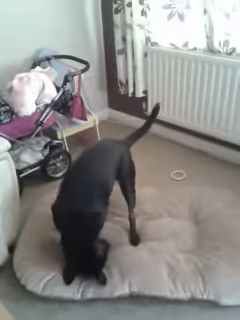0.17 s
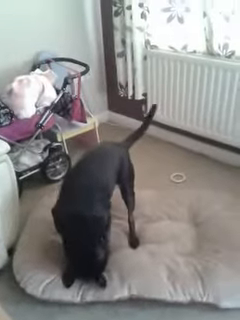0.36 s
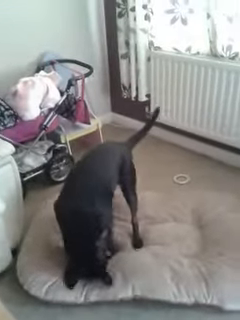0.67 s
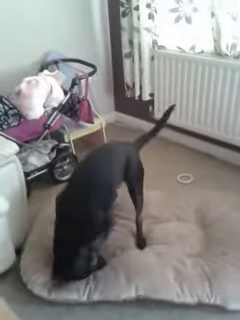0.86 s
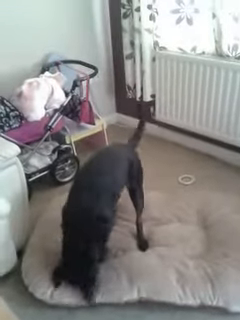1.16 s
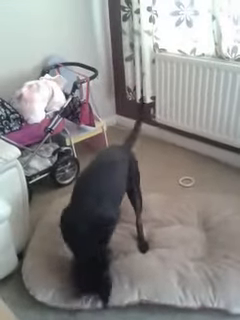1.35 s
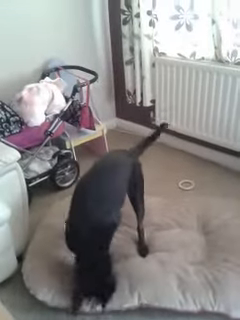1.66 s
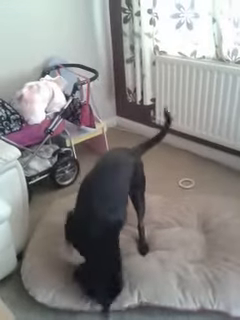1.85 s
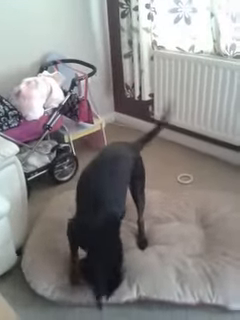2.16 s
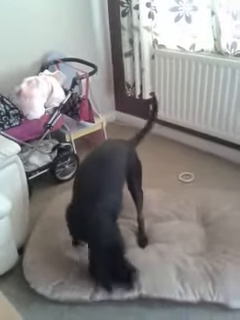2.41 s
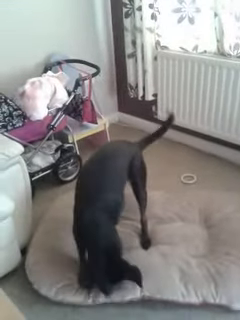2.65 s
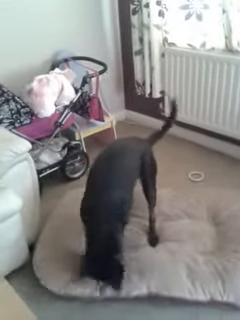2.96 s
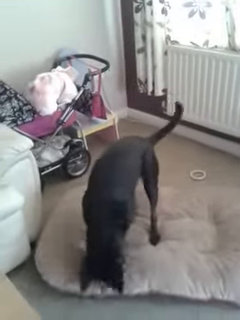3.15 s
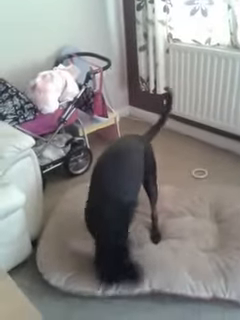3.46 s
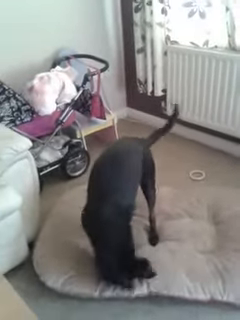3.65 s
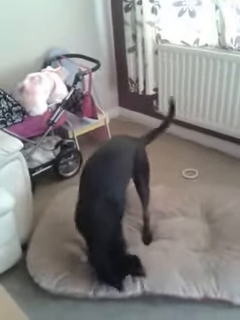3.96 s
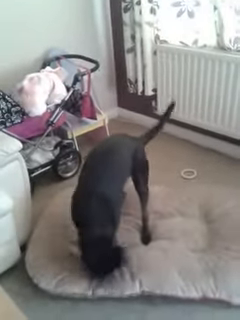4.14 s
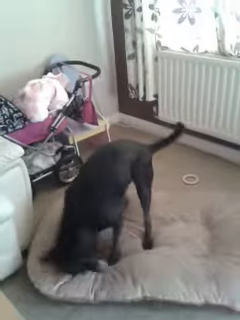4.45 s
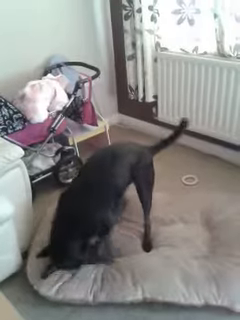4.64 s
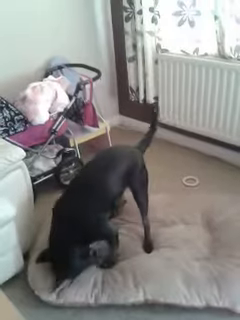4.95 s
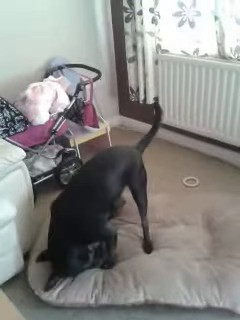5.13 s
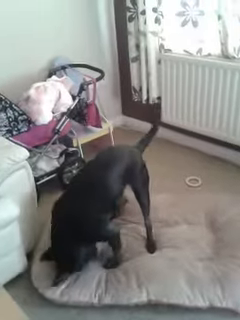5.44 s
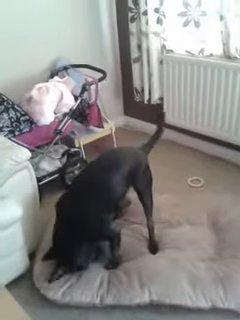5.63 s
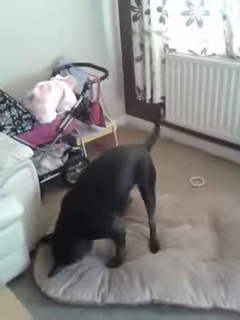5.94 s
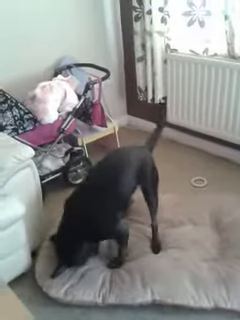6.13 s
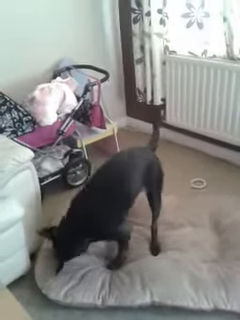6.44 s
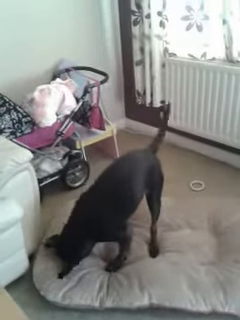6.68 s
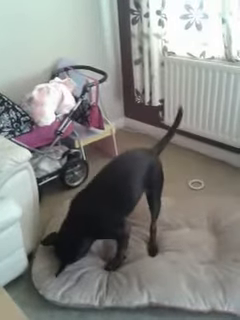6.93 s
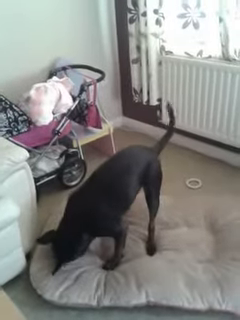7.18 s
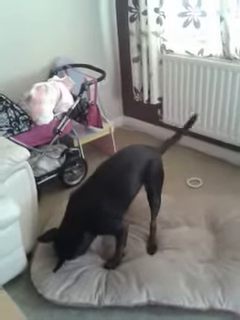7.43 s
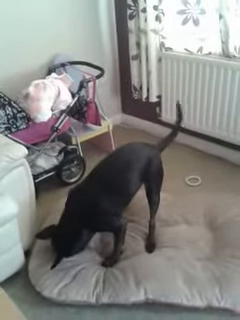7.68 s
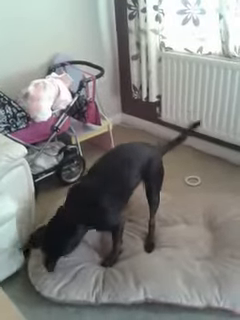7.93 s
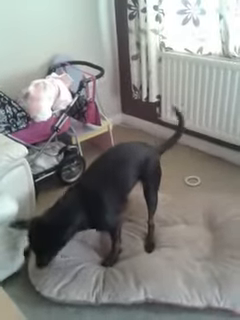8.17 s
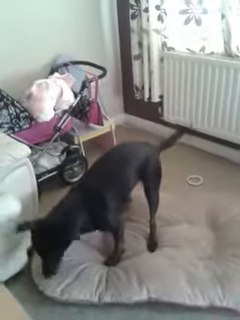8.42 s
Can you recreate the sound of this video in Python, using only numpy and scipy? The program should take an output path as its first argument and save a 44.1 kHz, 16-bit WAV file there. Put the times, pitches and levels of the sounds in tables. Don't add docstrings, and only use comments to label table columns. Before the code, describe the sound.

A dog roots and paws at a stuffed bed with uneven rustles, dull thumps and scratches, then knocks something hollow with a sharp metallic clink.

```python
import sys
import numpy as np
from scipy import signal
from scipy.fft import rfft, irfft
from scipy.io import wavfile
from scipy.ndimage import uniform_filter1d

SR = 44100
rng = np.random.default_rng(int(sys.argv[2]) if len(sys.argv) > 2 else 0)


def gain_from_db(level_db):
    decades = np.asarray(level_db, float) / 20
    return 10 ** decades


def log_audio(samples):
    frames = np.atleast_2d(samples).T
    limited = np.clip(frames, -1, 1)
    pcm = np.round(limited * 32767).astype(np.int16)
    wavfile.write(sys.argv[1], SR, pcm)


N = 377055


def unit(x):
    return x / np.sqrt(np.mean(x ** 2))


def band(x, hz, width_hz):
    return signal.lfilter(*signal.iirpeak(min(hz, 9000), hz / width_hz, fs=SR), x)


def steep(x, low_hz, high_hz):
    return unit(signal.sosfilt(signal.butter(3, [low_hz, high_hz], "band", fs=SR, output="sos"), x))


def grains(count, rate, scatter_db):
    draw = rng.random((count, 2))
    happens = draw[:, 0] < rate / SR
    strength = gain_from_db(-scatter_db * np.log(draw[:, 1] + 1e-9))
    return happens * strength * rng.standard_normal(count)


def walk(rate):
    hold = int(SR / rate)
    levels = np.repeat(rng.standard_normal(N // hold + 1), hold)
    return unit(uniform_filter1d(levels, hold)[:N])


def add(out, s, x):
    i = int(s * SR)
    out[i:i + len(x)] += x[:N - i]


def fade(t, t60, rise):
    swell = np.sin(np.pi / 2 * np.clip(t / max(rise, 1e-4), 0, 1)) ** 2
    return swell * gain_from_db(-60 * t / max(t60, .01))


# frequency in Hz, density in dB per Hz.
AIR = [(15, -10.5), (35, -18.5), (65, -28.5), (100, -40.5), (200, -32), (330, -19), (740, -20.5),
       (2300, -26), (6700, -33), (7400, -57)]
AIR_DB = -61.5


def air():
    hz, db = np.transpose(AIR)
    shape = np.interp(np.log(np.fft.rfftfreq(N, 1 / SR) + 1), np.log(hz), db)
    return gain_from_db(AIR_DB) * unit(irfft(rfft(rng.standard_normal(N)) * gain_from_db(shape), N))


# start in seconds, level in dB, pitch in Hz, t60 in seconds.
BUMPS = [(2.91, -54, 70, .2), (3.08, -46, 24, .2), (3.16, -58, 45, .15), (3.39, -60, 60, .15),
         (4.69, -60, 65, .1), (5.409, -62, 60, .12), (5.822, -43, 62, .16), (7.509, -60, 55, .15),
         (8.149, -62, 35, 0.31)]


def hand():
    out, t = np.zeros(N), np.arange(SR // 2) / SR
    for s, db, hz, t60 in BUMPS:
        add(out, s, gain_from_db(db) * np.sin(2 * np.pi * hz * t) * fade(t, t60, 0.006))
    return out


ROOM_T60_S, ROOM_DB = 0.23, -11


def room(x):
    t = np.arange(int(.6 * SR)) / SR
    echoes = rng.standard_normal(len(t)) * (rng.random(len(t)) < .01 + 6 * t) * (t > .003)
    dull = band(echoes, 810, 2700)
    bright = echoes - dull
    tail = dull * fade(t, ROOM_T60_S, .002) + gain_from_db(-8.5) * bright * fade(t, 0.48 * ROOM_T60_S, .002)
    return signal.fftconvolve(x, tail / np.sqrt(np.sum(tail ** 2)))[:N]


KNOCKS_S = [
    5.359,
    5.443,
    5.821,
]
# frequency in Hz, t60 in seconds, level in dB at the
# first knock, at the rebound and at the hard knock, split of the pair in Hz, partner's share.
TUBE = [(2409, 0.33, -53, -50.5, -5, 8.5, -0.92), (2440, 0.3, -57, -59, -25.5, 9, 0.5),
        (3720, 0.3, -49, -54, -26.5, -20.5, 0.77), (4586, 0.34, -55, -55, -22.5, -10, -0.23),
        (4620, 0.8, -52, -56, -45, 10.5, 0.45), (5140, .34, -61, -61, -39.5, 16, .45),
        (6500, 0.4, -48, -57, -40, 21, -.45), (7050, 0.22, -42, -59, -31, 19, 0.25)]
# frequency in Hz, level in dB, t60 in seconds.
FRAME = [(472, -10.5, 0.33), (635, -16, 0.18), (704, -12.5, 0.2), (733, -6.5, 0.099), (873, -4.5, 0.25),
         (915, -8, 0.18), (1024, -6.5, 0.31), (1060, -7.5, 0.43), (1181, -10, 0.55), (1270, -13.5, 0.098),
         (1505, -19.5, .3), (1578, -13.5, 0.28), (1779, -10.5, .3), (1968, -8.5, 0.3), (2190, -12, 0.24),
         (2330, -13, 0.17)]
FRAME_DB = [-20, -26, -9.5]
BEAT_LAG_S = .011
RATTLE_DB = 2.5


def knocks():
    out, t = np.zeros(N), np.arange(SR // 2) / SR
    for k, s in enumerate(KNOCKS_S):
        rattle = gain_from_db(RATTLE_DB * walk(70)[:len(t)])
        for hz, t60, *db, split, share in TUBE:
            partner = np.sin(2 * np.pi * (hz * t + split * (t - BEAT_LAG_S)))
            pair = np.sin(2 * np.pi * hz * t) + share * partner
            add(out, s, gain_from_db(db[k]) * rattle * pair * fade(t, t60, 0.0018))
        for hz, db, t60 in FRAME:
            ring = np.sin(2 * np.pi * (hz * t + rng.random()))
            add(out, s, gain_from_db(db + FRAME_DB[k]) * ring * fade(t, t60, 0.0061))
    return out


# peak in seconds, rise in seconds, fall in seconds, # fibre
# hiss in dB, weight pressed into the stuffing in dB.
SWIPES = [(.04, 0.062, 0.18, -58, -5), (.2, 0.026, 0.094, -51, 2.5), (.712, .006, .06, -55, -12),
          (.75, 0.04, 0.18, -57, -1), (.86, 0.16, 0.087, -49, -2.5), (.938, 0.016, 0.093, -51, -7),
          (1.26, 0.067, 0.23, -50.5, 1), (2.32, 0.11, 0.24, -53.5, 5.5), (2.41, 0.16, 0.23, -51, -12),
          (2.959, 0.11, 0.079, -41.5, 5.5), (3.405, 0.067, 0.12, -43.5, 4.5), (3.49, .06, 0.06, -49, -11),
          (4.71, 0.044, .12, -50, 5.5), (4.82, .12, 0.12, -50, 3), (5.07, 0.11, 0.093, -57, -3),
          (5.27, 0.1, .12, -56.5, 0), (5.38, 0.063, 0.052, -42, -4), (5.455, 0.036, 0.06, -48, 2),
          (5.835, .02, 0.17, -30, 2), (6.08, 0.54, 0.089, -43, -7), (6.885, 0.037, .2, -52, -4),
          (7.578, .006, .03, -48, -10), (7.62, 0.17, 0.18, -53, 2), (7.865, 0.073, 0.11, -34.5, -2)]
# peak in seconds, rise in seconds, fall in seconds, #
# fibre hiss in dB, weight pressed into the stuffing in dB.
MORE_STROKES = [(.58, 0.46, .4, -70, -8), (1.15, .3, 0.27, -59.5, -4), (1.38, 0.16, 0.23, -55.5, -10),
                (1.84, .17, 0.31, -55.5, 0), (2.06, .4, 0.12, -53.5, -1), (2.72, .35, .3, -53, -9),
                (2.82, .4, 0.085, -51, -1), (3.1, .2, 0.21, -61, 6), (3.33, .2, .1, -59, -1),
                (3.71, .3, .6, -59, 0), (4.1, 0.38, 0.67, -53.5, -9.5), (4.26, .4, 0.28, -47, 1),
                (4.56, .5, 0.14, -57, -8), (5.56, .1, .12, -59, 3), (5.78, .16, .2, -49, -0.5),
                (6.32, 0.15, .5, -45.5, -2), (6.58, .4, 0.34, -54, 5.5), (6.73, .3, .3, -53.5, 5),
                (7.03, 0.16, 0.34, -50, -5.5), (7.4, 0.32, 0.59, -55.5, 1.5), (7.75, .25, .2, -54.5, 8),
                (8.04, .2, .2, -55, 2), (8.16, .2, .2, -55.5, 5), (8.27, 0.74, .25, -55, 1),
                (8.55, 0.23, .2, -54.5, -1)]
STROKE_DROP_DB = 15


def strokes(share, offset_db, lag, rest_db):
    t = np.arange(0, N / SR + .01, .002)
    every = np.concatenate([SWIPES, MORE_STROKES])
    peak, rise, fall, db, weight_db = np.transpose(every)[:, :, None]
    late = t - peak - lag
    slope = np.maximum(-late / rise, late / fall)
    db = db + offset_db + share * weight_db - STROKE_DROP_DB * slope
    power = np.sum(gain_from_db(db) ** 2, axis=0) + gain_from_db(rest_db) ** 2
    return np.interp(np.arange(N) / SR, t, np.sqrt(power))


# frequency in Hz, width in Hz, level in dB.
CRUNCH = [(360, 29, -1), (800, 1030, 17), (1300, 1400, -22.5)]
# frequency in Hz, width in Hz, level in dB.
SCRAPE = [(2094, 860, 0.69), (2620, 1170, -1.6)]
# frequency in Hz, width in Hz, level in dB.
HISS = [(4600, 2400, 6), (5650, 1800, 10.5), (6600, 1300, -30.5)]
# level in dB of crunch, scrape and hiss.
REST_DB = [-75.5, -71.5, -72.5]
SCRAPE_DB, SCRAPE_PER_WEIGHT, SCRAPE_LAG_S = -4, -0.39, .012


def cloth():
    crunch_gain = strokes(0.85, 0, 0, REST_DB[0])
    scrape_gain = strokes(SCRAPE_PER_WEIGHT, SCRAPE_DB, SCRAPE_LAG_S, REST_DB[1])
    hiss_gain = strokes(0, 0, 0, REST_DB[2])
    layers = [  # gain, resonances, cracks per second, flicker in dB
        (crunch_gain, CRUNCH, 2500, 1.6),
        (scrape_gain, SCRAPE, 6000, 1.3),
        (hiss_gain, HISS, 12000, 1.1)]
    out = np.zeros(N)
    for gain, modes, rate, flicker_db in layers:
        crack = grains(N, rate, 0.42)
        layer = np.zeros(N)
        for hz, width_hz, db in modes:
            flicker = gain_from_db(db + flicker_db * np.tanh(walk(24)))
            layer += flicker * band(band(crack, hz, 1.7 * width_hz), hz, 1.7 * width_hz)
        out += unit(layer) * gain
    return out


# start in seconds, length in seconds, start pitch in Hz,
# end pitch in Hz, level in dB.
SKIDS = [(1.24, 0.12, 1400, 950, -47), (1.6, 0.09, 1400, 400, -56), (1.91, .22, 1250, 820, -48),
         (5.25, .07, 450, 800, -45), (5.29, 0.065, 950, 1050, -39)]
SKID_WIDTH_HZ = 330


def skids():
    out = np.zeros(N)
    for s, length, start_hz, end_hz, db in SKIDS:
        share = np.arange(int(length * SR)) / (length * SR)
        hz = end_hz + (start_hz - end_hz) * (1 - share) ** 3.1
        phase = 2 * np.pi * np.cumsum(hz) / SR
        rough = uniform_filter1d(rng.standard_normal(SR // 2), int(SR / SKID_WIDTH_HZ))
        rough = unit(rough)[:len(share)]
        add(out, s, gain_from_db(db) * rough * np.sin(phase) * np.sin(np.pi * share ** 0.68))
    return out


THUD_KNEE_DB, THUD_SQUEEZE = -17.5, 0.94


def contacts(table, rise, tick_db, thud_db):
    out, t = np.zeros(N), np.arange(SR // 2) / SR
    for s, db, hz, length, bright_db in table:
        crack = grains(len(t), 4000, 1.1)
        body = steep(crack, 0.54 * hz, 1.483 * hz) + gain_from_db(bright_db) * steep(crack, 1.86 * hz, 2976)
        thud = steep(crack, 160.6, 323) + gain_from_db(7.5) * steep(crack, 309.4, 427)
        body += gain_from_db(thud_db - THUD_SQUEEZE * max(db - THUD_KNEE_DB, 0)) * thud
        hold = fade(t, 1.11, rise) * gain_from_db(-40 * (t / max(length, .02)) ** 1.636)
        tick = np.sin(2 * np.pi * hz * t) * fade(t, .007, 0.00052)
        snap = steep(crack, 1500, 7000) * fade(t, 0.022, .0005)
        tick += gain_from_db(-20.5 + bright_db / 2) * snap
        add(out, s, gain_from_db(db) * (gain_from_db(-11.5) * body * hold + gain_from_db(tick_db) * tick))
    return out


# start in seconds, peak level in dB, body pitch in Hz,
# length in seconds, bright share in dB.
PADS = [(.505, -43.5, 600, .093, -1), (1.17, -52, 300, .12, -20), (1.6, -49, 380, .15, -20),
        (2.11, -51, 300, 0.088, -22), (2.233, -38, 635, 0.084, -21), (3.068, -43, 700, 0.1, -14),
        (3.27, -51, 400, .1, -20), (4.02, -46, 450, .1, -15), (4.19, -46, 350, .15, -15),
        (4.27, -46, 450, .08, -15), (4.439, -39, 816, 0.073, -16), (4.62, -50, 350, .08, -20),
        (5.1, -54, 400, 0.08, -14), (5.29, -38, 450, .08, -9), (5.62, -45, 400, .08, -20),
        (6.17, -48, 300, .2, -20), (6.385, -42, 350, .1, -20), (7.235, -52, 410, .1, -20),
        (6.6, -49, 300, .14, -20)]
# start in seconds, peak level in dB, body pitch in Hz,
# length in seconds, bright share in dB.
TAPS = [(1.914, -39, 1190, 0.054, -16), (3.613, -40, 778, 0.06, -17), (3.689, -41, 541, 0.073, -10),
        (4.406, -32.5, 859, 0.054, -5), (6.167, -52, 1180, 0.076, -18), (7.509, -26.5, 800, 0.13, -8),
        (8.519, -40.5, 727, 0.11, -1)]
# start in seconds, peak level in dB, body pitch in Hz,
# length in seconds, bright share in dB.
CLICKS = [(.710, -44.5, 1360, .014, 8), (2.155, -44, 900, 0.022, -2), (2.333, -26, 800, 0.015, -11),
          (3.70, -41, 1420, 0.018, -3), (4.690, -25.5, 960, 0.017, -4), (6.385, -26, 970, 0.054, -0.5),
          (6.407, -29, 1490, 0.016, 7), (7.57, -36, 1510, .03, -2)]
# start in seconds, peak level in dB, body pitch in Hz,
# length in seconds, bright share in dB.
DRAGS = [(.75, -36.5, 850, 0.19, -26), (.83, -36.5, 800, 0.17, -26), (2.265, -26.5, 845, 0.095, -4),
         (2.866, -22.5, 800, 0.23, -4), (2.915, -21.5, 785, 0.13, -4.5), (3.335, -26, 505, 0.12, -17),
         (3.745, -32.5, 810, 0.11, -21), (4.465, -28.5, 623, 0.26, -21), (4.775, -31, 910, 0.19, -6),
         (5.30, -23.5, 1010, 0.14, -2), (6.395, -22.5, 696, 0.13, -1.5), (7.805, -21.5, 940, 0.45, -1)]
# start in seconds, peak level in dB, body pitch in Hz,
# length in seconds, bright share in dB.
BLOWS = [(.183, -30.5, 850, 0.11, -9), (.709, -52, 1000, 0.2, 8), (.929, -50, 600, .1, -14),
         (1.235, -30, 950, 0.24, -10), (1.779, -23.5, 715, 0.13, -11), (2.333, -24.5, 676, 0.16, -8.5),
         (3.378, -18, 806, 0.12, -8), (4.690, -24.5, 800, 0.15, -7.5), (5.358, -5.5, 780, 0.12, -13),
         (5.445, -11, 786, 0.19, -11.5), (5.674, -33, 480, 0.2, -19), (5.820, -1, 1100, 0.14, -8),
         (5.857, -4.5, 1260, 0.16, -12), (6.874, -34, 710, 0.19, -4), (7.570, -39, 600, .06, 0)]


def paws():
    out = contacts(BLOWS, rise=0.0022, tick_db=0.69, thud_db=-9)
    out += contacts(TAPS, rise=0.00078, tick_db=1.6, thud_db=-15.5)
    out += contacts(PADS, rise=0.00078, tick_db=1.6, thud_db=-2.5)
    out += contacts(CLICKS, rise=.0005, tick_db=0.88, thud_db=-19)
    out += contacts(DRAGS, rise=0.034, tick_db=-25, thud_db=-13.5)
    return out + skids()


def scene():
    touch = paws()
    near = touch + gain_from_db(ROOM_DB) * room(touch) + cloth() + knocks()
    near = signal.sosfilt(signal.butter(5, 150, "high", fs=SR, output="sos"), near)
    return (near + air() + hand())[None]


def band_limit(x):
    return signal.sosfilt(signal.butter(12, 15900, fs=SR, output="sos"), x)


SEAM_S, SEAM_FIRST_S = .7, .51
CEILING, OFFSET = .715, .0014


def record(dry):
    x = signal.sosfilt(signal.cheby1(12, .3, 7080, fs=SR, output="sos"), dry)
    mirror = x * np.cos(2 * np.pi * 16000 * np.arange(N) / SR)
    seams = (np.arange(SEAM_FIRST_S, N / SR, SEAM_S) * SR).astype(int)
    mirror[:, seams] += 28 * (x[:, seams + 3] - x[:, seams - 3])
    leak = signal.butter(6, [7400, 8900], "band", fs=SR, output="sos")
    x = x + gain_from_db(-38) * signal.sosfilt(leak, mirror)
    x = x / (1 + np.abs(x / CEILING) ** 13) ** (1 / 13)
    return band_limit(x + OFFSET)


dry = scene()
out = record(dry)
log_audio(out)
```